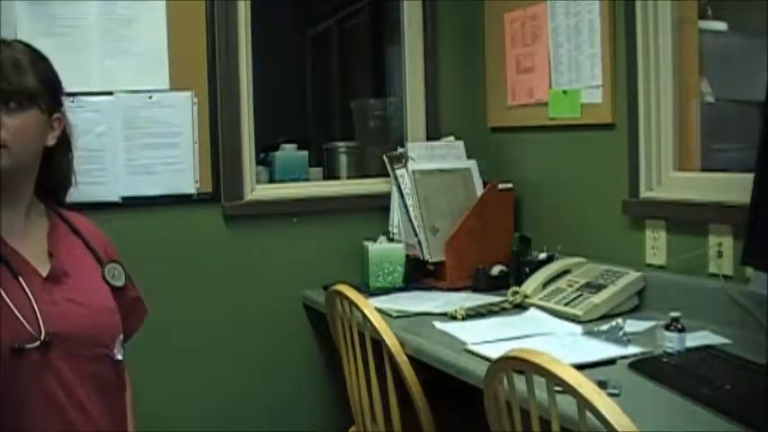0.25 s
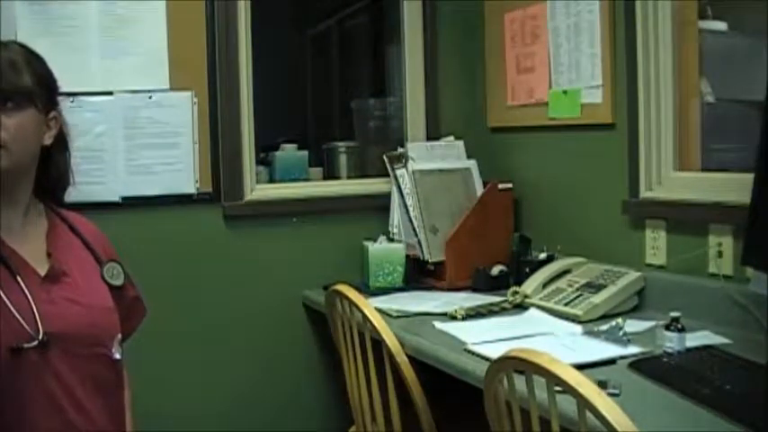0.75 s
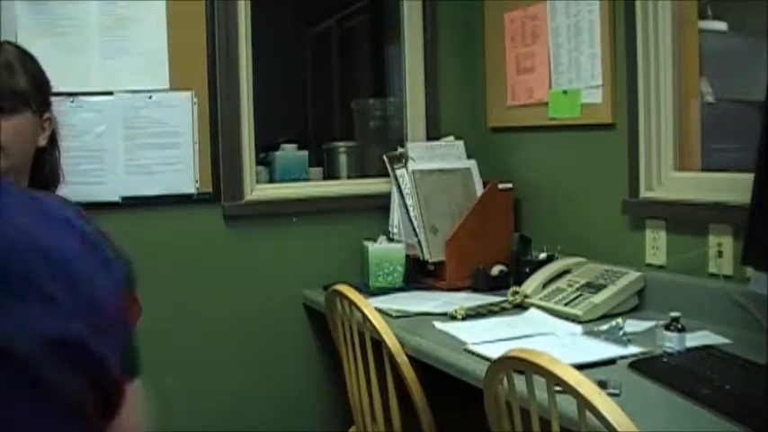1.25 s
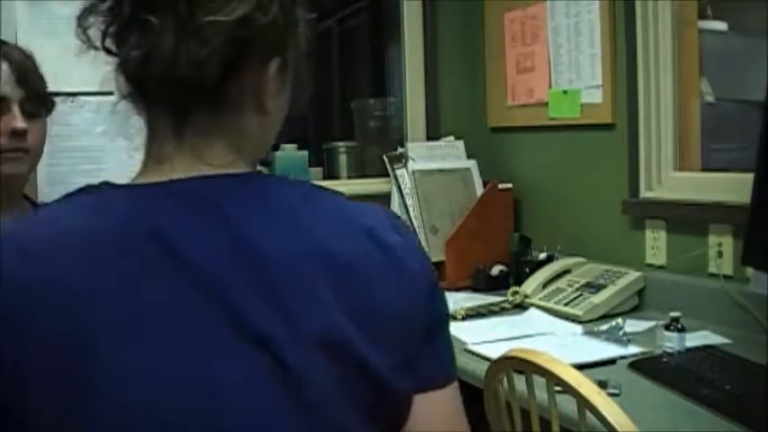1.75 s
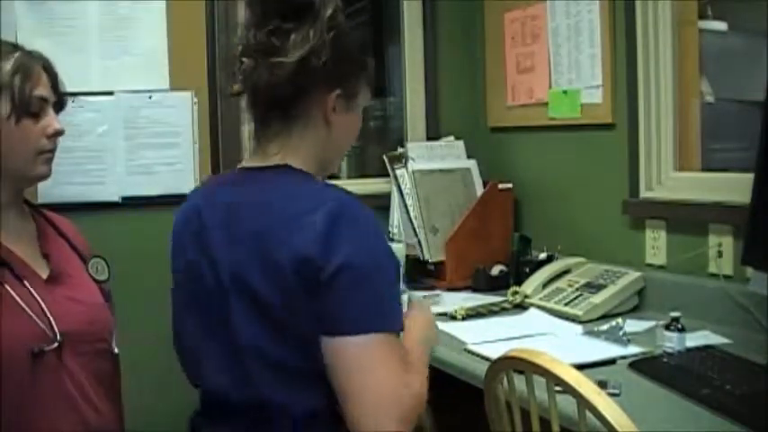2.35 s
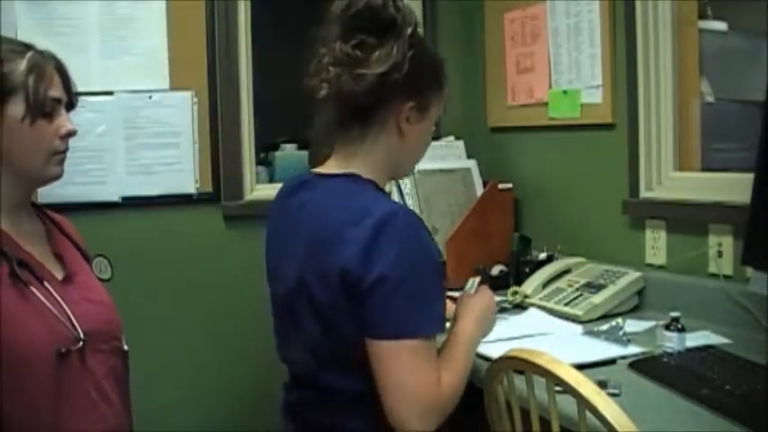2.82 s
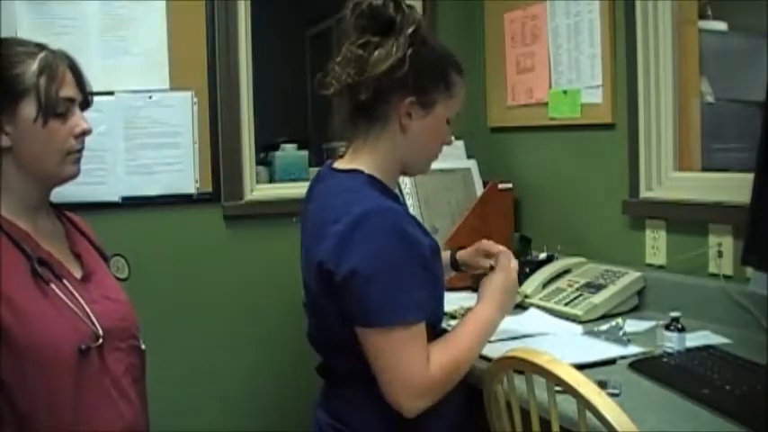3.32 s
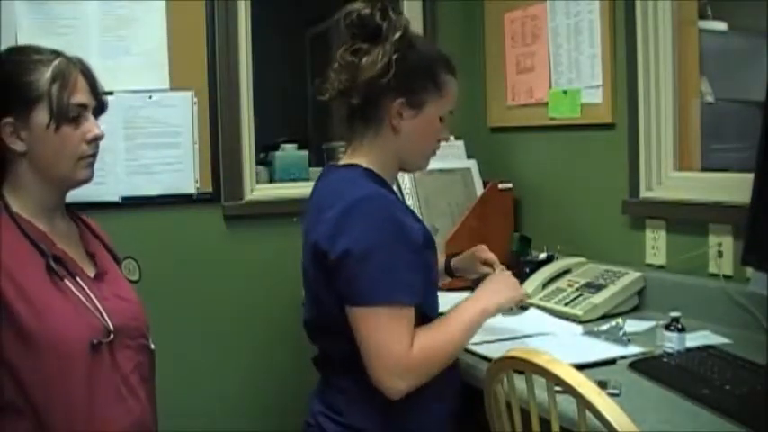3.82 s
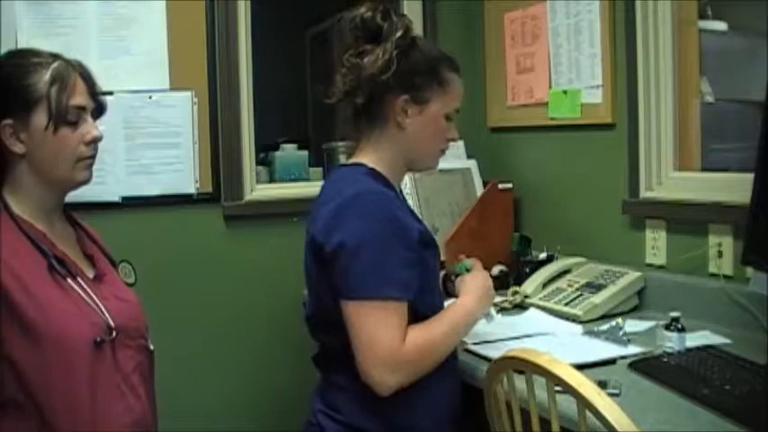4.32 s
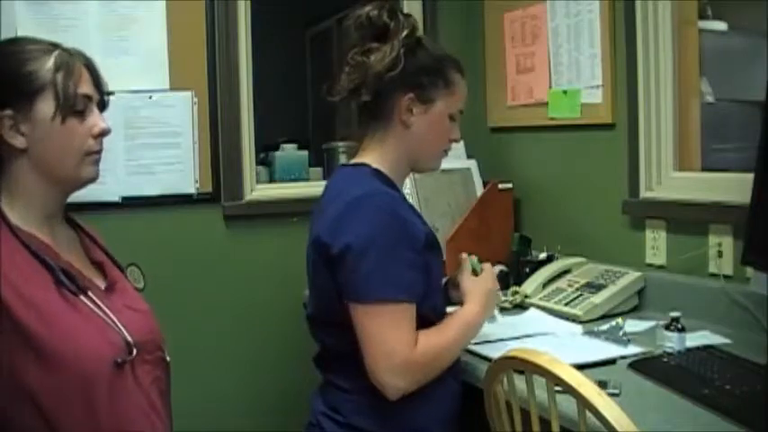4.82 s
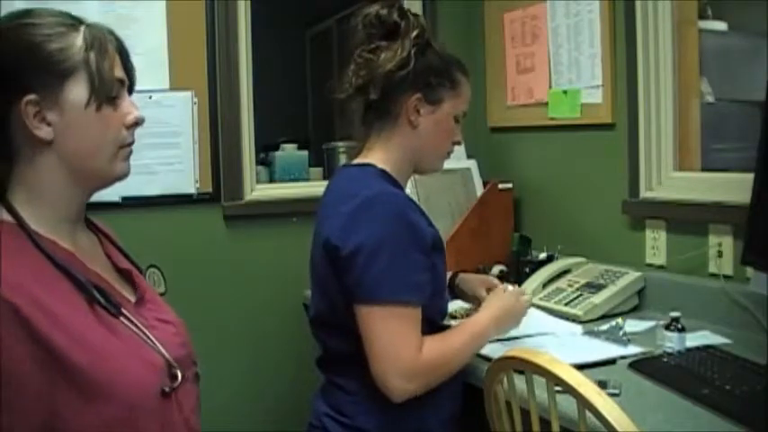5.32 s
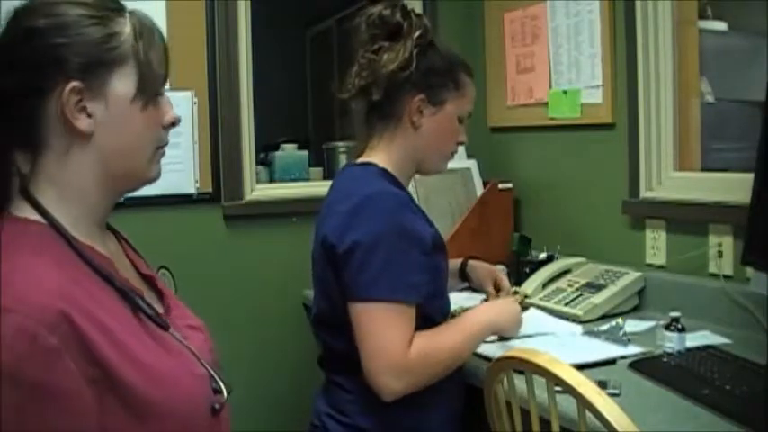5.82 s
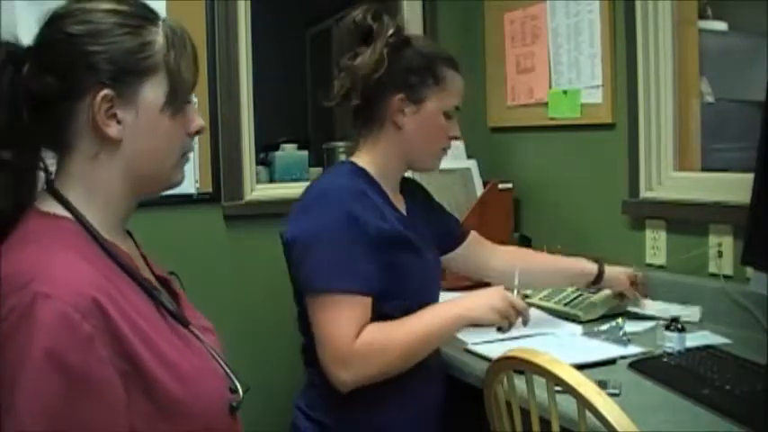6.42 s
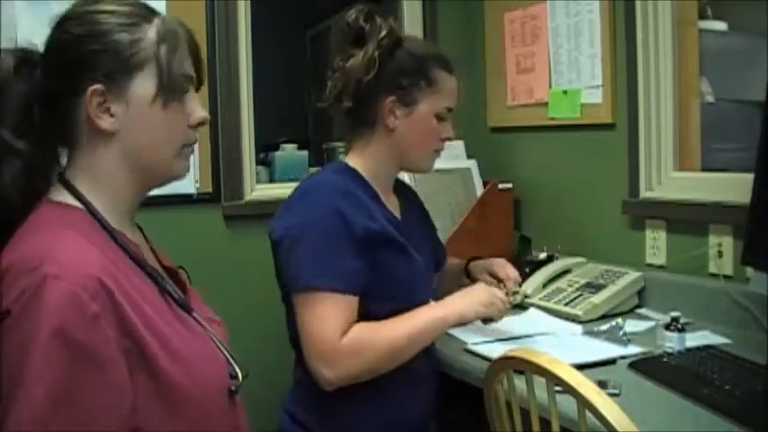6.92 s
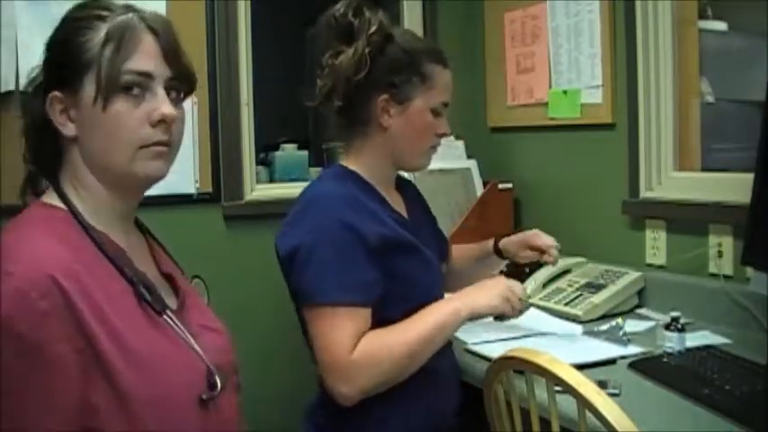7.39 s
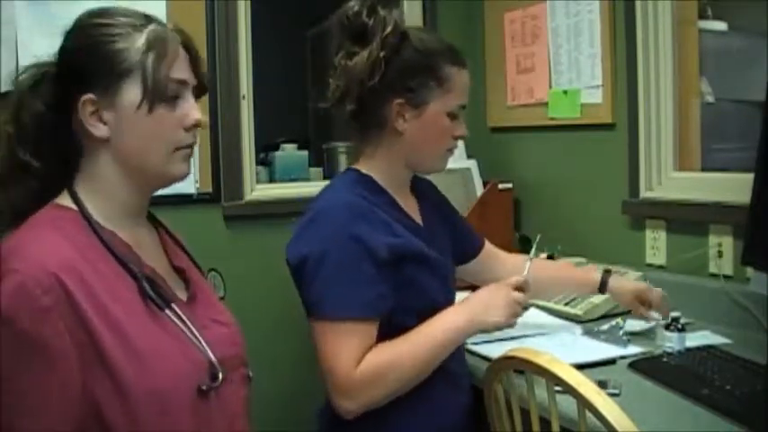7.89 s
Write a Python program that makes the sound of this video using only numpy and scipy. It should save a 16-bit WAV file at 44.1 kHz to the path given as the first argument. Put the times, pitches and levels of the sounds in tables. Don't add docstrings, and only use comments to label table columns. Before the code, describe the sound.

Close crinkling of a small film-and-paper packet, one very loud pop, a burst of crackles and light counter knocks in a small humming room.

```python
import sys
import numpy as np
from scipy import signal
from scipy.io import wavfile

SR = 44100
rng = np.random.default_rng(int(sys.argv[2]) if len(sys.argv) > 2 else 0)


def invert_db(x):
    u = np.asarray(x, float) / 20
    return 10 ** u


def log_audio(samples):
    frames = np.atleast_2d(samples).T
    limited = np.clip(frames, -1, 1)
    pcm = np.round(limited * 32767).astype(np.int16)
    wavfile.write(sys.argv[1], SR, pcm)


N = 359415

# frequency [Hz], density [dB per Hz].
VENT_SPECTRUM = [(15, -42), (25, -18), (70, -1.5), (200, -1.5), (285, 5), (516, -2.5), (607, 1.5),
                 (911, -6), (1100, -4), (4370, -16.5), (8360, -15), (10100, -23), (16000, -32)]
# frequency [Hz], likeness [0 to 1].
VENT_LIKENESS = [(60, 0.042), (150, 0.011), (400, 0.043), (1500, 0.047), (8000, 0.16)]
# time [s], level [dB].
RUMBLE_LEVEL = [(0, -58.5), (.9, -64), (1.36, -59), (2.5, -63), (3.38, -60), (4.6, -64), (8.15, -63)]
# time [s], level [dB].
DRONE_LEVEL = [(0, -76), (.55, -68), (.82, -58.5), (2.02, -53.5), (2.43, -62.5), (2.84, -55), (3.25, -60),
               (3.36, -55), (3.5, -60), (4, -77), (4.45, -63), (4.9, -70), (5.65, -67), (6, -77),
               (6.97, -68), (7.7, -83), (7.81, -59), (8.15, -80)]
# frequency [Hz], time to fall 60 dB [s].
ROOM_DECAY = [(150, 0.54), (800, 0.27), (2100, 0.33), (5500, 0.35), (12000, 0.18)]
# frequency [Hz], level [dB].
ROOM_SPECTRUM = [(150, 1.5), (330, 4.5), (550, 9.5), (800, 9.5), (2000, 2.5), (5000, 0.5), (9000, 3),
                 (14000, 9.5)]
# frequency [Hz], likeness [0 to 1].
ROOM_LIKENESS = [(150, 0.101), (1000, 0.8), (4000, 0.7), (10000, 0.11)]
# delay [s], level [dB].
EARLY_ECHOES = [(.005, -14), (.0075, -32), (.013, -19.5)]
# centre [Hz], width [Hz], lift [dB].
MIC_PEAKS = [(8900, 2850, 4), (5200, 1100, 0.5)]
# time [s], lean to the left [dB].
HANDS_LEAN = [(0, 3.5), (1, 2.5), (2.2, 1.5), (2.9, 2), (4.5, 1), (5.5, 2), (6.4, 1), (6.7, 2), (8.15, 1.2)]
# peak [s], fade [s], ring [Hz], width [Hz], level [dB].
PAPER_SLIDES = [(1.35, .1, 1900, 900, -42), (1.546, 0.043, 1790, 900, -48), (2.07, 0.068, 1900, 2000, -56),
                (2.2, 0.071, 2100, 1500, -52), (3.135, 0.028, 2200, 1200, -53),
                (3.265, .045, 1800, 500, -47), (3.37, .025, 2300, 1500, -56), (3.57, .03, 2200, 1200, -59),
                (5.07, .05, 1000, 900, -50), (5.0, .02, 2200, 2000, -54), (7.58, .03, 450, 500, -60),
                (.6, .08, 800, 700, -56), (5.89, 0.078, 1500, 2400, -49.5), (6.66, 0.079, 1300, 2600, -47),
                (6.73, 0.036, 1790, 2400, -53.5)]
# peak [s], fade [s], level [dB].
FILM_BRUSHES = [(2.88, 0.12, -51), (3.5, 0.037, -51.5), (5.96, .05, -50.5), (6.7, 0.06, -55),
                (7.94, 0.04, -62), (7.885, 0.019, -57)]
# peak [s], fade [s], paper level [dB], film
# relative to paper [dB], cloth relative to paper [dB].
HAND_MOVES = [(0, 0.065, -40, 1, -3), (.3, 1, -55.5, 7, -2), (.56, 0.37, -60.5, 15, -4),
              (.77, 0.19, -48, -7, -19), (1.22, 0.093, -49.5, -7.5, 2), (1.359, 0.091, -35, -2.5, -9),
              (1.52, .22, -41.5, -0.5, -7), (1.73, 0.13, -61.5, 13.5, 5.5),
              (2.06, 0.065, -54.5, -4, 5.5), (2.1, .03, -69, -1, -5), (2.22, 0.31, -48, -3.5, -9.5),
              (2.33, 0.048, -62, 7, -5), (2.42, 0.33, -69.5, 15, 2), (2.82, 0.17, -43, 2, -14),
              (2.92, 0.13, -45, -1.5, 1.5), (3.26, 0.14, -43.5, -2.5, -6), (3.55, 0.32, -53.5, 3, -17),
              (3.74, .03, -53, 3, -8), (3.88, .05, -48, 7, -6), (3.97, 0.07, -44.5, 6, -2.5),
                 (4.03, .03, -47, 4, -6), (4.15, 0.21, -41.5, 0, -11.5), (4.522, 0.044, -33.5, 8, -21),
                 (4.72, 0.048, -27.5, 7.5, -16), (4.79, 0.32, -56.5, 17.5, 1),
                 (4.97, 0.36, -45.5, -13, -4.5), (5.15, 0.13, -44.5, 5.5, -20),
                 (5.32, 0.18, -49.5, 5.5, -1), (5.47, 0.11, -51.5, 12, -17), (5.87, 0.26, -53, 8.5, -1),
                 (6.08, 0.14, -45, 5, -7), (6.5, 0.11, -62, 16, 5), (6.651, 0.14, -44.5, 1.5, -1),
                 (7.1, 0.079, -59, 3, -27), (7.51, 0.39, -63.5, 4, -16), (7.8, 0.39, -54, -1.5, -4),
                 (7.9, 0.069, -56.5, -5, 9.5)]
# time [s], peak [dB], board ring [Hz], upper wood relative to it [dB].
COUNTER_KNOCKS = [(0.148, -41.5, 249, 4.5), (0.15, -44, 130, -20), (2.596, -40.5, 500, -6),
                  (2.865, -43, 530, -11), (3.218, -34.5, 420, 2.5), (3.229, -31, 140, -8),
                  (3.244, -32, 335, 8), (3.259, -29.5, 750, -11), (3.286, -37, 315, -6),
                  (3.295, -40.5, 120, -22), (3.552, -48, 616, -3), (4.055, -39.5, 570, 8.5),
                  (4.591, -38, 200, -18), (4.612, -46, 270, -12), (4.714, -48, 580, 15),
                  (5.862, -42, 510, 3.5), (5.928, -43.5, 247, -9), (6.074, -34, 596, -7),
                  (6.105, -44, 580, -6), (6.41, -38.5, 217, -24), (6.432, -44, 215, -23),
                  (7.568, -44.5, 206, -25), (7.789, -48, 406, 2)]
# time [s], ring [Hz], peak [dB].
RINGING_TAPS = [(.555, 4560, -22), (.556, 7200, -25.5), (.5555, 9350, -26), (.668, 4660, -24),
                (.668, 2100, -27), (2.192, 2100, -35), (5.0417, 1590, -19.5), (5.0415, 6180, -17),
                (.0975, 1600, -33), (.1485, 1500, -30), (.2365, 1500, -35), (3.2455, 1100, -27),
                (5.8655, 1470, -22.5), (5.866, 2630, -39), (5.32, 1852, -36.5), (.407, 2200, -37),
                (4.886, 1530, -32), (6.484, 4500, -19), (6.998, 7500, -26.5), (6.998, 2750, -28.5)]
# time [s], peak [dB], film ring [Hz], paper ring [Hz],
# paper relative to film [dB].
LOUD_SNAPS = [(0.2988, -21, 4160, 3300, -7), (0.5542, -16.5, 4950, 1470, -11.5),
              (0.667, -16, 5230, 1950, -15), (1.5466, -19, 4700, 1800, -12.5),
              (3.7982, -24, 7200, 3480, -21), (4.054, -13.5, 4700, 2070, -13.5),
              (4.1325, -19.5, 7600, 2030, -17), (4.2921, -7.5, 6550, 2670, -12),
              (4.4577, 5, 6000, 2600, -18), (4.6445, -19.5, 3620, 3600, -20),
              (4.6573, -13, 7550, 2600, -14.5), (4.6771, -11, 5370, 3500, -19),
              (4.6886, -20, 4950, 3330, -17), (4.7008, -10.5, 8790, 3500, -13),
              (4.7094, -8, 4840, 2800, -14), (4.7135, -9, 8600, 2520, -17), (4.7209, -11, 8250, 2700, -12),
              (5.0416, -2.5, 8300, 3450, -17), (6.0786, -16, 5200, 1790, -9),
              (6.4644, -15, 5240, 2340, -6.5), (6.4841, -7, 4700, 2600, -13.5),
              (6.9942, -24.5, 7750, 3380, -17), (6.9964, -35, 7540, 2480, -4.5),
              (7.7832, -26, 5700, 2250, -5)]
# time [s], peak [dB], film ring [Hz].
FETCHING_TICKS = [(0.0965, -29.5, 4100), (.1476, -28.5, 5600), (.155, -35, 7500), (.2783, -46, 6500),
                  (0.307, -38, 4500), (0.4686, -32, 6500), (1.2446, -38, 3400), (1.3025, -21.5, 6200),
                  (2.093, -43, 5200), (2.3007, -51, 8600), (2.3273, -38, 5000), (2.7367, -36.5, 5830),
                  (3.476, -36, 6760), (3.5189, -44.5, 3470), (3.975, -35, 5500), (3.893, -35, 7500),
                  (3.93, -36, 6000), (4.026, -37, 5000), (4.094, -27, 8000), (4.14, -33, 6000),
                  (0.208, -37, 3400), (0.2354, -37.5, 3580), (0.3724, -31, 4300), (0.4126, -26.5, 7200),
                  (0.488, -32.5, 4930), (.531, -31.5, 4970), (1.2007, -37.5, 3560), (1.2853, -27, 4480),
                  (1.297, -30, 8600), (1.424, -33.5, 3560), (1.685, -36.5, 3500), (1.7448, -33, 6060),
                  (2.1, -37, 5450), (2.319, -39, 5570), (2.192, -37, 2900), (2.598, -39.5, 3460),
                  (2.7728, -31.5, 5340), (3.1138, -33, 4660), (3.127, -40, 9000), (3.1276, -40, 4020),
                  (3.244, -25.5, 6300), (3.3576, -31.5, 3900), (3.5523, -28, 5150), (3.728, -38, 3830),
                  (3.862, -32, 8940), (3.9606, -30, 4200)]
# time [s], peak [dB], film ring [Hz].
PEELING_TICKS = [(4.1966, -33, 7750), (4.269, -42, 3540), (4.666, -27, 6500), (4.694, -24, 7000),
                 (4.705, -21, 6000), (4.727, -22, 6500), (4.757, -32, 7500), (4.768, -29, 3500),
                 (4.7321, -24, 9490), (4.7395, -27, 5020), (4.7486, -31, 3970), (4.9155, -27.5, 7360),
                 (4.954, -30, 7880), (5.157, -33, 6500), (5.219, -35, 9800), (5.3184, -32, 4640),
                 (5.466, -38, 8500), (5.471, -36, 3100), (5.6337, -27.5, 10900), (5.385, -35, 6900),
                 (5.3888, -27.5, 6160), (5.6292, -31.5, 7300), (5.8186, -33, 9100), (5.824, -33, 9890),
                 (5.8644, -30.5, 3530), (6.074, -25, 6000), (6.082, -19.5, 5860), (6.442, -33, 5350),
                 (6.4438, -26.5, 7100), (6.488, -22, 7500), (6.4954, -23.5, 4500), (6.499, -27, 6000),
                 (6.842, -43, 4500), (7.3015, -36, 5700), (7.304, -29, 8950), (7.309, -40, 8950),
                 (7.871, -28.5, 4300), (7.8712, -30.5, 9500), (7.879, -33, 8500), (7.887, -38, 10500),
                 (7.9253, -29, 7400)]
# time [s], peak [dB], film ring [Hz].
FILM_PRICKS = [(0.905, -32.5, 9600), (3.67, -32, 5950), (3.708, -44, 8500), (3.7305, -34.5, 8200),
               (3.779, -41, 8520), (4.8875, -25, 8100), (5.2125, -33, 9600), (5.5758, -28, 7680),
               (5.848, -29, 6890), (5.9141, -26, 6800), (6.2321, -29, 8800), (7.091, -35, 7550),
               (7.3328, -32, 9390), (7.5483, -35.5, 8470)]

TICK_PAPER_HZ = 1900


def rms_one(x):
    return x / np.sqrt(np.mean(x ** 2) + 1e-20)


def peak_one(x):
    return x / np.abs(x).max()


def in_time(rows):
    s, level = np.transpose(rows)
    return np.interp(np.arange(N) / SR, s, level)


def at_hz(points, hz):
    point_hz, value = np.transpose(points)
    return np.interp(np.log(hz), np.log(point_hz), value)


def band(x, low_hz, high_hz):
    sos = signal.butter(2, [low_hz, min(high_hz, 0.45 * SR)], "band", fs=SR, output="sos")
    return signal.sosfilt(sos, x)


def resonance(x, hz, width_hz):
    r = np.exp(-np.pi * width_hz / SR)
    poles = [1, -2 * r * np.cos(2 * np.pi * hz / SR), r * r]
    return signal.lfilter([(1 - r * r) / 2, 0, (r * r - 1) / 2], poles, x)


def flicker(rate, spread_db):
    r = np.exp(-80 * np.pi * rate / SR)
    noise = rng.standard_normal(N // 40 + 2002)
    slow = signal.lfilter([1], [1, -2 * r, r * r], noise)[2000:]
    return np.interp(np.arange(N) / 40, np.arange(len(slow)), invert_db(spread_db * rms_one(slow)))


def swell(peak_s, fade_s):
    t = (np.arange(N) / SR - peak_s) / fade_s
    rise_share = 0.99
    return invert_db(-13 * np.where(t < 0, -t / rise_share, t) ** 1.16)


def add(track, s, sound):
    i = round(s * SR)
    track[i:i + len(sound)] += sound[:N - i]


def stereo_bands(size, likeness):
    edges = 25 * 2 ** np.arange(0, 9.6, 0.5)
    white = rng.standard_normal((2, 2, size))
    for k, (low, high) in enumerate(zip(edges, edges[1:])):
        mid, side = band(white[k % 2], low, high)
        hz = np.sqrt(low * high)
        alike = np.clip(at_hz(likeness, hz), -1, 1)
        yield hz, np.sqrt(1 + alike) * mid + np.sqrt(1 - alike) * side * [[1], [-1]]


def ventilation():
    rumble = invert_db(in_time(RUMBLE_LEVEL) + 61.5)
    hiss = np.zeros((2, N))
    for hz, noise in stereo_bands(N, VENT_LIKENESS):
        patches = flicker(1.8, 1.7) * (rumble if hz < 400 else 1)
        hiss += invert_db(at_hz(VENT_SPECTRUM, hz)) * patches * noise
    return invert_db(-55.5) * rms_one(hiss)


def drone():
    hz = 63.3 + 6 * np.exp(-np.arange(N) / SR / 3.5)
    phase = 2 * np.pi * np.cumsum(hz * flicker(5.9, 0.13)) / SR
    tone = np.sin(phase + np.array([[0], [1.1]]))
    return np.sqrt(2) * invert_db(in_time(DRONE_LEVEL) - 8) * flicker(1.5, 1.9) * tone


def room(x):
    t, spots = np.arange(16000) / SR, len(x)
    tail = np.zeros((2, spots, len(t)))
    for hz, noise in stereo_bands(len(t) * spots, ROOM_LIKENESS):
        decay_db = at_hz(ROOM_SPECTRUM, hz) - 60 * t / at_hz(ROOM_DECAY, hz)
        tail += invert_db(decay_db) * noise.reshape(2, spots, -1)
    tail = tail * np.clip((t - 0.002) / 0.00015, 0, 1)
    tail = tail / np.sqrt(np.sum(tail ** 2) / 2 / spots)
    for s, level_db in EARLY_ECHOES:
        tail[..., round(s * SR)] += invert_db(level_db)
    return signal.fftconvolve(x[None], tail, axes=2)[..., :N].sum(axis=1)


def microphone(x):
    for hz, width_hz, lift_db in MIC_PEAKS:
        x = x + (invert_db(lift_db) - 1) * resonance(x, hz, width_hz)
    return signal.sosfilt(signal.butter(2, 10130, fs=SR, output="sos"), x)


def slides():
    grain = rng.standard_normal(N) * invert_db(1.4 * rng.exponential(1, N))
    out = np.zeros(N)
    for s, fade_s, hz, width_hz, level_db in PAPER_SLIDES:
        gap = resonance(resonance(grain, hz, width_hz), hz, 0.6 * width_hz)
        out += invert_db(level_db + 7) * swell(s, fade_s) * rms_one(gap)
    return out


def rustle(low_hz, high_hz, per_s, spread_db, cycles=3.7, clump_db=3.0):
    born = np.flatnonzero(rng.random(N) < per_s * flicker(14, clump_db) / SR)
    which, size, sign = rng.random((3, len(born)))
    grains = np.full((6, N), 1e-18)
    grains[(6 * which).astype(int), born] = invert_db(-spread_db * np.log(size + 0.013)) * np.sign(sign - 0.5)
    rings = np.zeros(N)
    for grain, hz in zip(grains, np.geomspace(low_hz * 1.14, high_hz * 0.88, 6)):
        rings += resonance(grain, hz, hz / cycles) * flicker(11, 4.0)
    return rms_one(band(rings, low_hz * 0.65, high_hz * 1.47))


def brushes():
    strokes = sum(invert_db(level_db) * swell(s, fade_s) for s, fade_s, level_db in FILM_BRUSHES)
    return strokes * rustle(7000, 13700, per_s=5400, spread_db=1.4)


def handling():
    peak_s, fade_s, paper_db, film_db, cloth_db = np.transpose(HAND_MOVES)
    moves = np.array([swell(s, fade) ** 2 for s, fade in zip(peak_s, fade_s)])
    cloth = np.sqrt(invert_db(2 * (paper_db + cloth_db)) @ moves)
    paper = np.sqrt(invert_db(2 * paper_db) @ moves)
    film = np.sqrt(invert_db(2 * (paper_db + film_db)) @ moves)
    crackle = rustle(2600, 13000, per_s=260, spread_db=4.4, cycles=2.5, clump_db=6.0)
    film_rustle = rustle(3170, 11200, per_s=5000, spread_db=0.78, clump_db=4.5) + invert_db(-10.5) * crackle
    return (cloth * rustle(448, 1570, per_s=3000, spread_db=1.3)
            + paper * rustle(1520, 4630, per_s=4000, spread_db=2.1)
            + film * film_rustle)


def knocks():
    out, t = np.zeros(N), np.arange(4000) / SR
    for s, peak_db, hz, upper_db in COUNTER_KNOCKS:
        contact = rng.standard_normal(len(t)) * np.exp(-t / 0.014)
        board = resonance(contact, hz, 0.43 * hz)
        board -= invert_db(-9.5) * resonance(contact, 1.58 * hz, 0.49 * hz)
        board += invert_db(-12) * band(contact, 81, 580)
        upper = peak_one(band(contact, 420, 1360))
        add(out, s, invert_db(peak_db) * (peak_one(board) + invert_db(upper_db) * upper))
    return out


def ringing_taps():
    out, click = np.zeros(N), signal.unit_impulse(800)
    for s, hz, peak_db in RINGING_TAPS:
        ring = resonance(resonance(click, hz, 1200), hz, 1200)
        add(out, s, invert_db(peak_db) * peak_one(ring))
    return out


def creases():
    rows = []
    for snap in LOUD_SNAPS:
        send_db = -2.5 - 0.3055 * (snap[1] + 20)
        rows.append((*snap, send_db))
    for ticks, more_db in ((FETCHING_TICKS, 4), (PEELING_TICKS, 0)):
        for s, peak_db, film_hz in ticks:
            paper_hz = TICK_PAPER_HZ * 2 ** (0.25 * rng.standard_normal())
            paper_db = -13.5 + more_db - 7.5 * np.log2(film_hz / 6000)
            rows.append((s, peak_db, film_hz, paper_hz, paper_db, 0))
    for prick in FILM_PRICKS:
        rows.append((*prick, TICK_PAPER_HZ, -30, -5.5))
    return rows


def spread(crack, turns_hz):
    for hz in turns_hz:
        r = np.exp(-np.pi * 0.35 * hz / SR)
        a = [1, -2 * r * np.cos(2 * np.pi * hz / SR), r * r]
        crack = signal.lfilter(a[::-1], a, crack)
    return crack


def snaps():
    t = np.arange(400) / SR
    direct, send = np.zeros(N), np.zeros((3, N))
    for k, (s, peak_db, film_hz, paper_hz, paper_db, send_db) in enumerate(creases()):
        step = (t == 0) + 0.05 * rng.standard_normal(len(t)) * np.exp(-t / 0.0004)
        crack = spread(step, 2000 * 2 ** rng.uniform(0, 2.4, 3))
        octaves = np.log2(film_hz / 6000)
        film = resonance(crack, film_hz, 0.3 * film_hz)
        film += invert_db(-7 - 3 * octaves) * band(crack, 0.64 * film_hz, 1.69 * film_hz)
        film -= invert_db(-12 + 11 * octaves) * band(crack, 7300, 15500)
        paper = resonance(crack, paper_hz, 0.36 * paper_hz) + invert_db(-11.5) * band(crack, 810, 3180)
        film = invert_db(peak_db - 3) * peak_one(film)
        paper = invert_db(peak_db + paper_db) * peak_one(paper)
        push = invert_db(3 * peak_db - 5.5) * band(crack, 38.8, 1400)
        add(direct, s, invert_db(1.5) * (film - paper) + push)
        add(send[k % 3], s, invert_db(send_db + 4.5) * (film - invert_db(-1.5) * paper))
    return direct, send


def scene():
    handled = handling() + slides()
    crack, crack_send = snaps()
    knock, tap = knocks(), ringing_taps()
    near = invert_db(-8) * handled + crack + knock + tap
    send = invert_db(6) * crack_send
    send += np.array([invert_db(-9) * handled, invert_db(-2.5) * knock, invert_db(5) * band(tap, 2330, 15000)])
    lean_db = in_time(HANDS_LEAN)
    sides = invert_db(np.array([lean_db, -lean_db]) / 2)
    return microphone((near + room(send) + brushes()) * sides) + ventilation() + drone()


def gain_control(x, threshold_db=-14, ratio=0.17, release_db_per_s=90, attack_s=0.0024):
    over_db = np.maximum(20 * np.log10(np.abs(x).max(axis=0) + 1e-9) - threshold_db, 0)
    climb_db = release_db_per_s * np.arange(N) / SR
    held_db = np.maximum.accumulate(ratio * over_db + climb_db) - climb_db
    r = np.exp(-1 / (attack_s * SR))
    return x * invert_db(-signal.lfilter([1 - r], [1, -r], held_db))


def low_pass(x):
    return signal.sosfilt(signal.butter(12, 16520, fs=SR, output="sos"), x)


def record(dry):
    mix = np.clip(gain_control(dry), -1, 1)
    return low_pass(mix)


dry = scene()
out = record(dry)
log_audio(out)
```